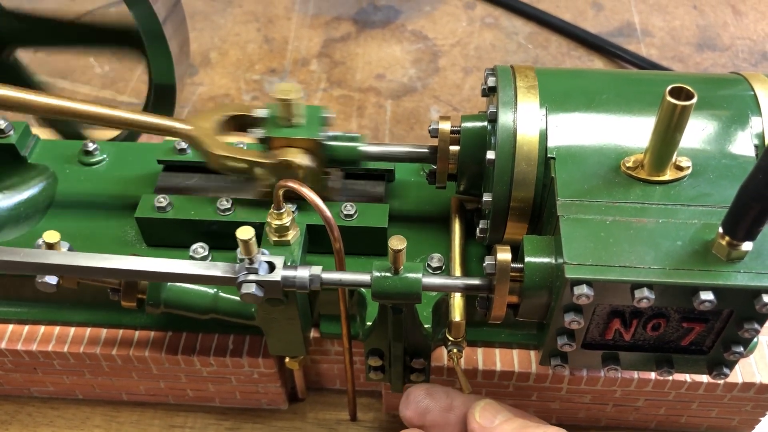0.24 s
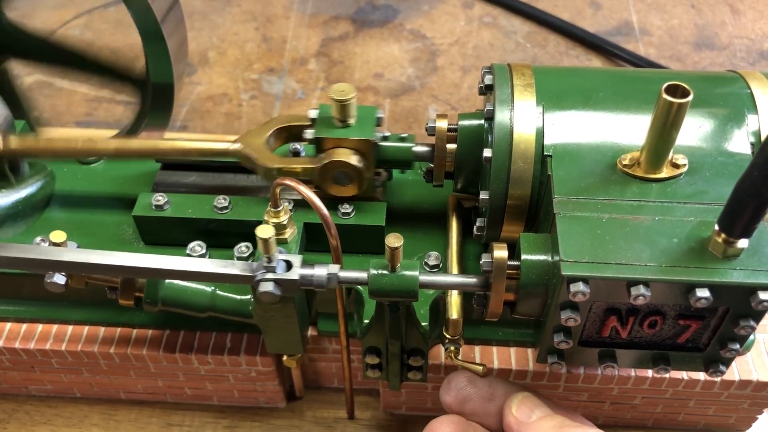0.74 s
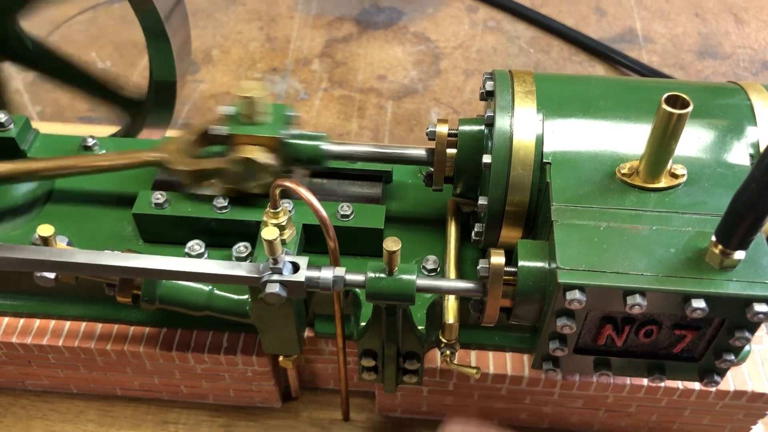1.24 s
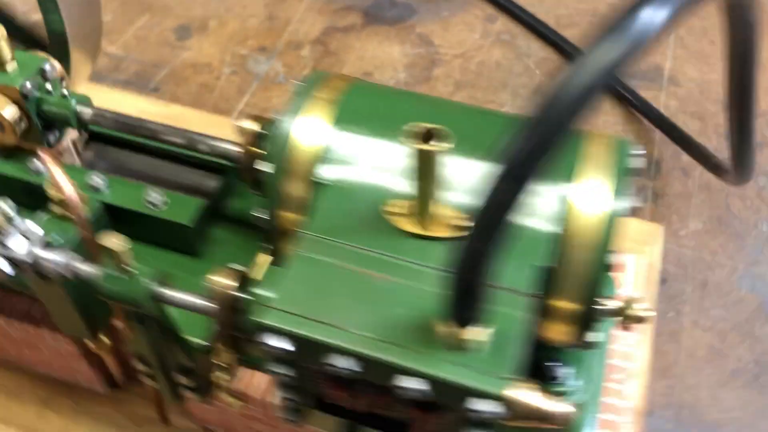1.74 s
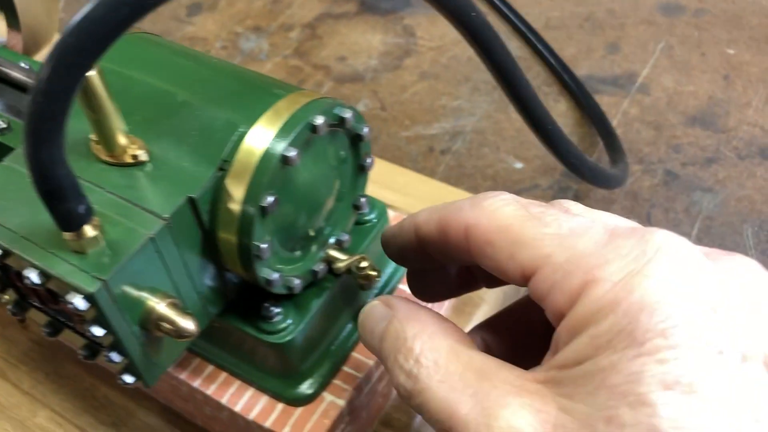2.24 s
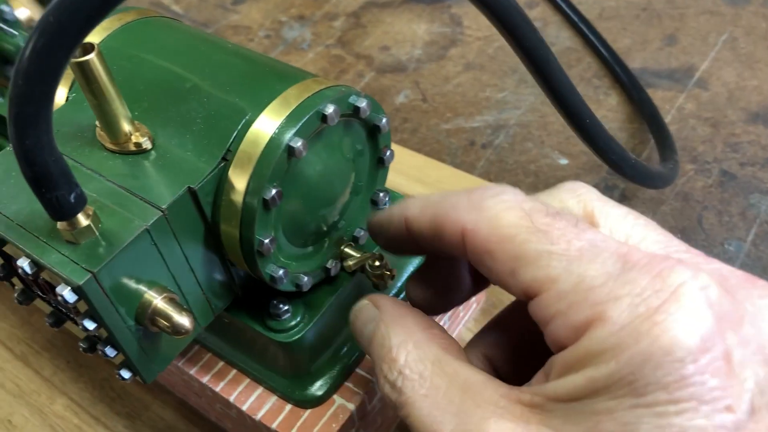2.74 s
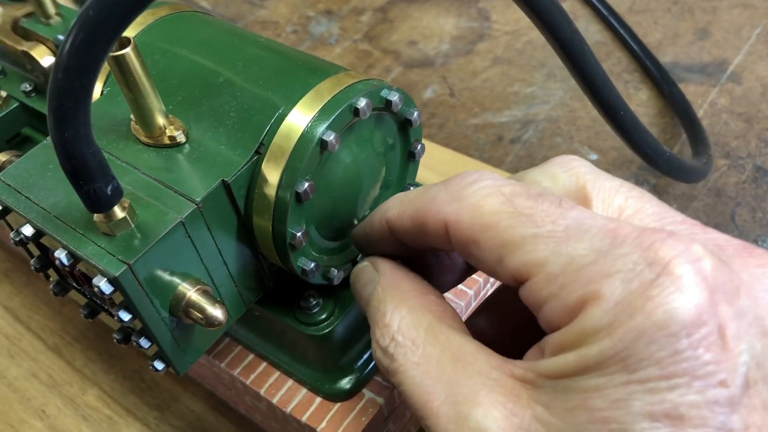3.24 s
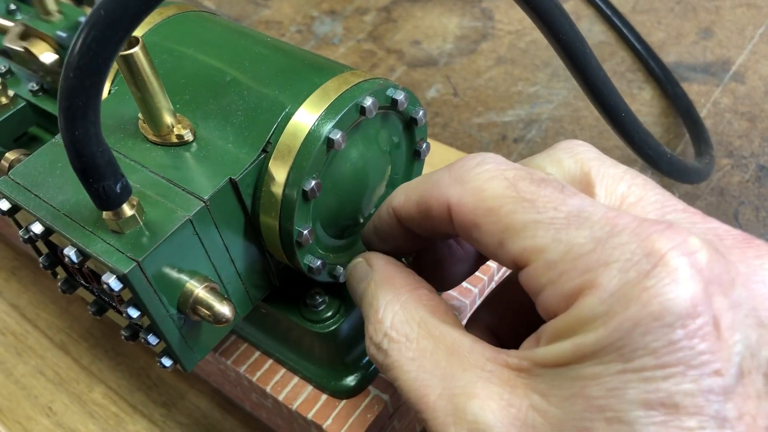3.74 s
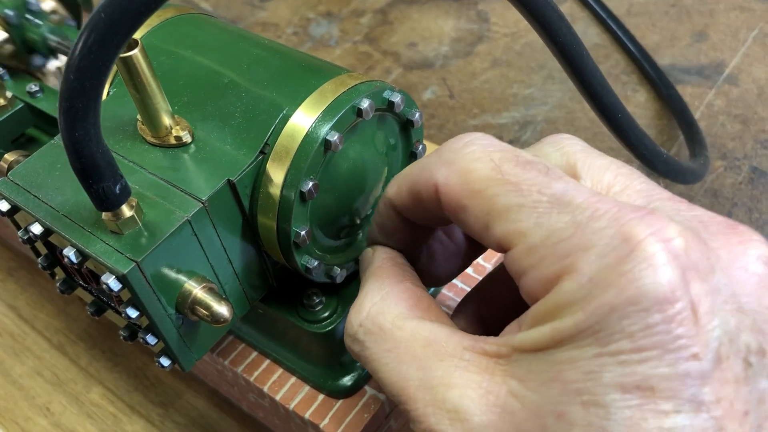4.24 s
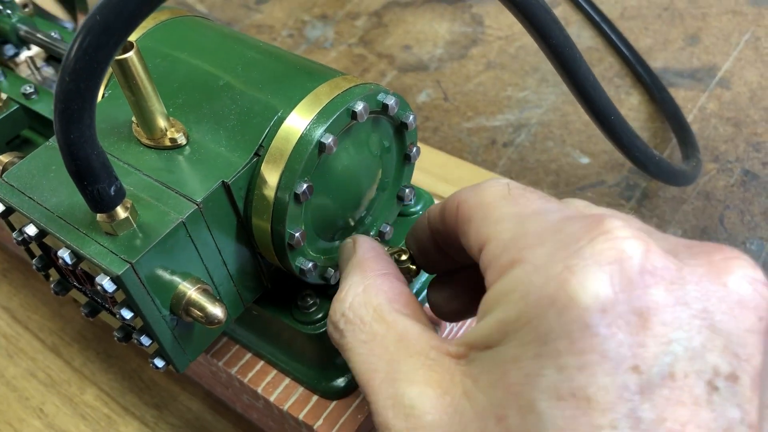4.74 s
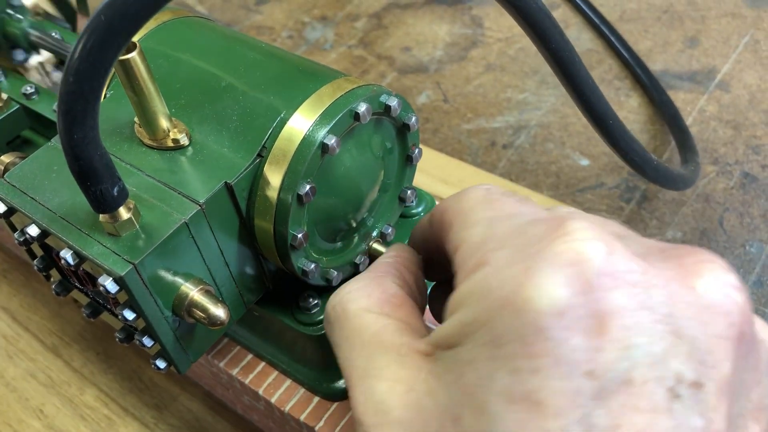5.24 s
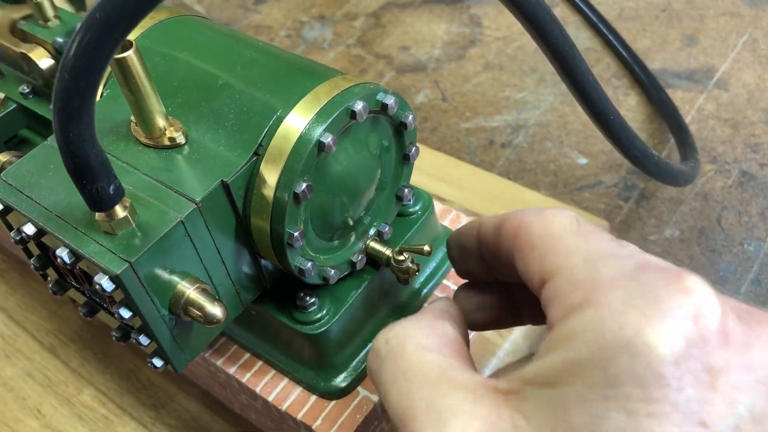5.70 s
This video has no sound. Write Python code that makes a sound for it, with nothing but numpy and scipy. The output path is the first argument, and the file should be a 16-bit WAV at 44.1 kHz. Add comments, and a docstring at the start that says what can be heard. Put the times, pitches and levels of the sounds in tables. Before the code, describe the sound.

An air blast sputters out, then a small engine runs evenly on compressed air, each stroke a swelling hiss ended by a crisp chuff, with small valve clacks and a dull knock every other stroke. The close microphone shifts along the cylinder near two seconds. Two strong hissing puffs interrupt near the end, one swelling, one fading. Dry indoor bench, faint short reflections, identical in both channels.

```python
"""At the workbench, beside the cylinder of a model horizontal steam engine running on compressed air.
At the start a drain cock is open: a loud puff of air that turns throaty as it runs out. Then, at about 100
turns a minute, valve and piston let air hiss, the motion knocks and each dead centre gives a short exhaust chuff.
From 1.6 to 2.3 s the microphone moves to the end of the cylinder; after 5 s two more puffs blow.
Air is shaped noise, knocks are short gliding resonances; bench rumble and close reflections lie around them."""
import sys
import numpy as np
from scipy import signal
from scipy.fft import rfft, irfft
from scipy.io import wavfile
from scipy.ndimage import uniform_filter1d, map_coordinates

SR = 44100
rng = np.random.default_rng(int(sys.argv[2]) if len(sys.argv) > 2 else 0)


def pcm_store(signal):
    """Save signal as 16-bit PCM."""
    levels = np.round(np.clip(np.atleast_2d(signal), -1, 1) * 32767)
    wavfile.write(sys.argv[1], SR, levels.astype(np.int16).T)


N = 263277
TIME = np.arange(N) / SR
FREQ = np.arange(N // 2 + 1) * SR / N + 1e-3  # just above zero, so its logarithm exists

# Dead centres that begin the outward and backward strokes in turn; a cylinder emptied by a drain cock
# hardly chuffs: centre_s, chuff_db (before the trims in exhaust)
DEAD_CENTRES = [(-0.109, -65), (0.154, -64), (0.505, -36.5), (0.8042, -35), (1.1246, -34.5), (1.4155, -35),
                (1.7339, -33), (2.0235, -33), (2.341, -31.5), (2.6303, -32.5), (2.9485, -33),
                (3.2386, -31.5), (3.5569, -32.5), (3.845, -33), (4.1616, -33), (4.451, -32.5), (4.768, -32),
                (5.058, -32), (5.39, -48), (5.7039, -33.5), (6.036, -67)]
# Microphone place: time_s, place (0 beside the cylinder, 1 at its end)
MICROPHONE_WALK = [(1.55, 0.025), (2.25, 0.97)]
# Steady rumble through the bench: pitch_hz, relative_db
RUMBLE_SPECTRUM = [(25, -37), (40, -3.5), (58, 6), (80, 0.5), (120, -0.5), (190, -8.5), (270, -3),
                   (370, -8), (520, -14.5), (900, -19), (2500, -24), (9000, -28), (16000, -54)]
# Slides rubbing in mid-stroke: pitch_hz, relative_db
RUBBING_SPECTRUM = [(60, -38), (170, -9.5), (270, 1), (370, -1), (520, -6), (700, -27), (1200, -31),
                    (4000, -75)]
# Soft thuds of bed and bench as the load changes in every stroke:
# after_centre_s, pitch_hz, rise_s, outward_db, backward_db
LOAD_THUDS = [(-.016, 288, 0.0028, -49, -41), (.018, 103, .007, -48, -44.5), (.036, 118, .0058, -48, -45),
              (.049, 329, .005, -40, -59), (.062, 94, .008, -53, -43), (.073, 72, .013, -39, -48.5),
              (.18, 276, .0049, -42.5, -52), (.186, 131, 0.008, -50.5, -44),
              (.198, 281, 0.0048, -43.5, -55)]
# Modes of the bed plate that ring on after a knock: pitch_hz, t60_s, ring_db
BED_MODES = [(71.5, 0.17, -12), (128, 0.095, -15), (282.5, 0.27, -9), (697, 0.11, -4.5)]
# Flow swelling with piston speed, one row outward and one backward:
# level_db, swell_db, fastest_at (share of stroke), width (share of stroke)
FLOW_SWELLS = [(-40.5, 8.5, 0.6, 0.28), (-39.5, 5, 0.47, 0.3)]
# Air passage resonances in the hiss, beside the cylinder and at its end: pitch_hz, half_width_hz, relative_db
HISS_BESIDE = [(806, 270, -7), (1192, 69, 1.5), (1830, 1600, -10.5), (3140, 284, -1.5), (3774, 99, 0.5),
               (4135, 132, 2.5), (5210, 330, -6), (6110, 480, -2), (7060, 380, 1), (7740, 810, 0.5),
               (9030, 180, 0.5), (10250, 1140, -2.5), (12240, 580, -9), (14532, 1640, -13.5)]
HISS_AT_END = [(920, 310, -9.5), (1260, 166, -2.5), (2260, 580, -16), (3224, 79, -2), (3300, 275, -3.5),
               (4126, 397, -3), (5110, 84, -5.5), (5700, 290, -8), (6260, 155, -6.5), (7110, 283, -2.5),
               (8320, 285, -3.5), (9740, 510, -5), (9486, 1700, -15), (10700, 810, -13.5),
               (12498, 1200, -18.5), (15364, 700, -19)]
# Faint upper whistle in the hiss: time_s, relative_db (to the rushing air)
WHISTLE_LEVELS = [(1.5, -16.5), (2.0, -11), (3.2, -15.5), (4.2, -19)]
# Air passage resonances in the chuff, beside the cylinder and at its end: pitch_hz, half_width_hz, relative_db
CHUFF_BESIDE = [(990, 350, -7.5), (2850, 520, -11), (3790, 260, -2.5), (4960, 200, -18.5), (6480, 170, 6.5),
                (7000, 180, -2), (7760, 660, -17.5), (8760, 860, 0), (10300, 250, -6.5), (13100, 380, -10),
                (14497, 1640, -17.5)]
CHUFF_AT_END = [(1154, 237, -2), (2511, 260, -13), (3580, 390, -2.5), (3920, 250, -0.5),
                (5564, 1000, -19.5), (6550, 180, 2.5), (6970, 350, -3), (7812, 540, -5), (8870, 440, 1.5),
                (9700, 320, -16), (10100, 190, 5), (12600, 250, -7), (13765, 360, -22), (18700, 1730, 1)]
# Drain cock puffs: opens_s, attack_s, shut_s, release_s, swell_db_per_s (before the band's share),
# body_db, middle_db, top_db
DRAIN_PUFFS = [(-.02, .02, 0.16, .055, 2, -41, -36, -38.5),
               (5.095, 0.044, 5.398, .065, 17, -40.5, -33.5, -29),
               (5.727, 0.014, 6.2, .05, -13, -45.5, -33, -34.5)]
# Spectrum of each puff's jet, one list per puff: pitch_hz, relative_db
JET_SPECTRA = [
    [(410, -49), (700, -12), (1180, -15), (1760, -12), (1980, -6), (2780, -26), (4620, -1.5), (5690, -5.5),
     (9830, -4), (10900, 0), (13400, -2), (14700, 7), (15700, -8)],
    [(2240, -24.5), (3800, -15), (4380, -10.5), (6290, -14), (7260, -6), (8930, -9), (9940, -0.5),
     (11300, -4), (15700, -5)],
    [(2240, -24.5), (3800, -15), (4460, -15), (4850, -16), (6330, -13.5), (9090, -1), (10900, 0.5),
     (14300, 4), (15700, -7)],
]
# Edges of a jet's body, middle and top: edge_hz
JET_EDGES_HZ = [0, 7000, 12000, 20000]
# Body, middle and top of a jet: follows (share of the swell), steepness (exponent of attack and release)
JET_RESPONSE = [(1.3, 1.1), (1.13, 1.4), (0.83, 1.6)]
# Near reflections from bench and castings: delay_beside_s, delay_at_end_s, level_db (before power scaling)
NEAR_ECHOES = [(.0021, .0027, -27.5), (.0037, .0043, -22), (.0062, .0067, -16.5), (.0091, 0.0072, -18)]

# the valve opens after one dead centre and shuts before the next; shut, it still leaks
VALVE_OPENS_S, VALVE_SHUTS_S, OPENING_S, SHUTTING_S, LEAK_DB = 0.04, 0.024, 0.0042, 0.0045, -23
PRESSURE_SAG_DB = 10  # over one stroke
# a puff drains the supply, so the hiss after it is weaker and recovers
DRAINED_DB, RECOVERY_S = 2.8, 0.22
# cylinder pressure, and with it the jet, dips midway through a puff (before the band's share)
MIDWAY_DIP_DB, MIDWAY_DIP_S = 2, 0.069
# one knock in every backward stroke, at this share of it; the level is before each part's trim
KNOCK_SHARE, KNOCK_DB = 0.59, -35
# the clack leads an outward, then a backward stroke; the level is before each part's trim
CLACK_LEAD_S, CLACK_DB = (0.033, 0.0254), -43
# change of level with the microphone at the end, and random spread from blow to blow
KNOCK_FAR_DB, CLACK_FAR_DB, UNEVEN_DB = -1.5, 0.5, 0.82
ROOM_T60_S, ROOM_DB = 0.15, -19
CUTOFF_HZ = 15900


def from_db(db):
    """Amplitude for a level in decibels."""
    return 10 ** (np.asarray(db) / 20)


def rms_one(x):
    """Scale a signal to an rms of 1."""
    return x / np.sqrt(np.mean(x ** 2) + 1e-20)


def add(out, s, sound):
    """Mix a short sound in at time s, trimmed to the scene."""
    i = round(s * SR)
    lo, hi = max(i, 0), min(i + len(sound), N)
    if hi > lo:
        out[lo:hi] += sound[lo - i:hi - i]


def noise(gain):
    """Noise of rms 1 with the given gain at each frequency."""
    return rms_one(irfft(rfft(rng.standard_normal(N)) * gain, N))


def colour(points):
    """Gain at each frequency, drawn through spectrum points on a logarithmic pitch scale."""
    hz, db = np.transpose(points)
    return from_db(np.interp(np.log(FREQ), np.log(hz), db))


def resonances(modes):
    """Gain at each frequency of steep resonances side by side, their powers added."""
    power = 0
    for hz, half_width, db in modes:
        power = power + from_db(db) ** 2 / (1 + ((FREQ - hz) / half_width) ** 2) ** 2
    return np.sqrt(power)


def flutter(rate_hz, depth_db):
    """Turbulence: a gain that wavers at random, slower than about rate_hz."""
    return from_db(depth_db * noise(1 / (1 + (FREQ / rate_hz) ** 2)))


def blip(start_hz, end_hz, glide_s, rise_s, rough):
    """A resonance that swells, dies and slides in pitch; a rough contact scatters its strength and phase."""
    t = np.arange(int(10 * rise_s * SR)) / SR
    hz = end_hz + (start_hz - end_hz) * np.exp(-t / glide_s)
    scatter = rms_one(uniform_filter1d(rng.standard_normal((2, len(t))), size=70))
    contact = 1 + rough * (scatter[0] + 1j * scatter[1])
    tone = contact * np.exp(2j * np.pi * np.cumsum(hz) / SR)
    envelope = (t / rise_s * np.exp(1 - t / rise_s)) ** 2  # peaks at rise_s
    return tone.imag / np.hypot(1, rough) * envelope


def microphone_place():
    """How far the microphone has come from beside the cylinder (0) to its end (1)."""
    return np.interp(TIME, *np.transpose(MICROPHONE_WALK))


def rushing_air(beside, at_end):
    """Turbulent air through the passages; its colour crossfades at equal power as the microphone moves."""
    place = microphone_place()
    return np.sqrt(1 - place) * noise(resonances(beside)) + np.sqrt(place) * noise(resonances(at_end))


def air_flow():
    """The valve opens after dead centre; the flow swells with piston speed and sags until the valve shuts."""
    centres = np.transpose(DEAD_CENTRES)[0]
    crank = np.interp(TIME, centres, np.arange(len(centres)))
    stroke, share = np.minimum(crank.astype(int), len(centres) - 2), crank % 1
    level_db, swell_db, fastest, width = np.array(FLOW_SWELLS)[stroke % 2].T
    flow_db = level_db + swell_db * np.exp(-((share - fastest) / width) ** 2) - PRESSURE_SAG_DB * share
    for _, _, shut, *_ in DRAIN_PUFFS:
        flow_db -= DRAINED_DB * (TIME > shut) * np.exp(-np.abs(TIME - shut) / RECOVERY_S)
    opened = 1 / (1 + np.exp((centres[stroke] + VALVE_OPENS_S - TIME) / OPENING_S))
    not_shut = 1 / (1 + np.exp((TIME - centres[stroke + 1] + VALVE_SHUTS_S) / SHUTTING_S))
    return from_db(flow_db) * np.maximum(opened * not_shut, from_db(LEAK_DB))


def bench_rumble():
    """Steady low noise through the bench."""
    return from_db(-54.0) * noise(colour(RUMBLE_SPECTRUM))


def slide_rubbing(flow):
    """The slides rub as noise that follows the air flow through each stroke."""
    return from_db(-21.5) * flow * noise(colour(RUBBING_SPECTRUM))


def load_thuds():
    """Bed and bench thud dully at set delays after each dead centre, uneven in pitch and strength."""
    out = np.zeros(N)
    for k, (centre, _) in enumerate(DEAD_CENTRES):
        for delay, hz, rise, *levels in LOAD_THUDS:
            pitch = hz * (1 + 0.044 * rng.standard_normal())
            db = levels[k % 2] + UNEVEN_DB * rng.standard_normal()
            add(out, centre + delay, from_db(db) * blip(pitch, pitch, 1, rise, rough=0.13))
    return out


def valve_clacks():
    """The valve clacks ahead of each dead centre: three resonances that drop in pitch."""
    out = np.zeros(N)
    centres = np.transpose(DEAD_CENTRES)[0]
    far = np.interp(centres, TIME, microphone_place())
    for k, centre in enumerate(centres):
        s = centre - CLACK_LEAD_S[k % 2]
        db = CLACK_DB + CLACK_FAR_DB * far[k] + UNEVEN_DB * rng.standard_normal()
        add(out, s - 0.0005, from_db(db - 4.0) * blip(5130, 3000, glide_s=0.0032, rise_s=0.0018, rough=1.0))
        add(out, s - 0.001, from_db(db - 4.0) * blip(2440, 1770, glide_s=0.0059, rise_s=0.0031, rough=0.98))
        add(out, s - 0.001, from_db(db - 3.5) * blip(1506, 400, glide_s=0.01104, rise_s=0.0055, rough=1.0))
    return out


def motion_knocks():
    """Slack in the motion is taken up once in every backward stroke: two resonances that drop in pitch."""
    out = np.zeros(N)
    centres = np.transpose(DEAD_CENTRES)[0]
    far = np.interp(centres, TIME, microphone_place())
    for start, end, away in zip(centres[1::2], centres[2::2], far[1::2]):
        s = start + KNOCK_SHARE * (end - start)
        db = KNOCK_DB + KNOCK_FAR_DB * away + UNEVEN_DB * rng.standard_normal()
        add(out, s - 0.005, from_db(db - 8.5) * blip(942, 636, glide_s=0.0047, rise_s=0.0055, rough=1.0))
        add(out, s - 0.001, from_db(db - 1.5) * blip(450, 242.3, glide_s=0.0043, rise_s=0.0075, rough=0.38))
    return out


def bed_plate(blows):
    """The casting adds its own ring to every blow: each mode is a two-pole resonator."""
    out = blows.copy()
    for hz, t60, db in BED_MODES:
        r = from_db(-60 / (t60 * SR))  # decay per sample
        poles = [1, -2 * r * np.cos(2 * np.pi * hz / SR), r * r]
        ring = signal.lfilter([2, 0, -2], poles, blows + 1e-18)
        out += from_db(db) * (1 - r * r) / 2 * ring
    return out


def whistle():
    """Two narrow resonances of the passages almost sing; the upper one comes and goes."""
    upper_gain = from_db(np.interp(TIME, *np.transpose(WHISTLE_LEVELS)))
    upper = upper_gain * noise(resonances([(3430, 55, 0)]))
    lower = from_db(-15.0) * noise(resonances([(1232, 45, 0)]))
    return upper + lower


def valve_hiss(flow):
    """Turbulent air past piston and valve: noise through the passages, as strong as the flow."""
    air = rushing_air(HISS_BESIDE, HISS_AT_END) + whistle()
    return from_db(-0.5) * flow * air * flutter(rate_hz=52, depth_db=1.0)


def exhaust(level_db=1.1, chirp_db=-14.5, opening_s=0.007084, closing_s=0.007623, wander=0.0093):
    """The port dumps the cylinder in one burst; its lowest resonance rises as the gap widens."""
    out = np.zeros(N)
    t = np.arange(-SR // 20, SR // 20) / SR
    shape = np.exp(-np.abs(t / np.where(t < 0, opening_s, closing_s)) ** 2.5)
    air = rushing_air(CHUFF_BESIDE, CHUFF_AT_END) * flutter(rate_hz=380, depth_db=1.0)
    for s, db in DEAD_CENTRES:
        # reading the air a little faster or slower shifts the resonances of every chuff
        at = (s + t * (1 + wander * rng.standard_normal())) * SR
        burst = shape * map_coordinates(air, [at], order=3, mode="reflect")
        add(out, s + t[0] - 0.0004, from_db(db + level_db) * burst)
        chirp = blip(511, 1344, glide_s=0.0161, rise_s=0.0059, rough=0.52)
        add(out, s - 0.009, from_db(db + chirp_db) * chirp)
    return out


def sputter(s=0.096, length_s=0.024, db=-44.5):
    """The first puff turns throaty as it runs out: a brief swell of three resonances."""
    throat = noise(resonances([(1680, 200, -3), (2040, 270, -1.0), (4860, 290, 0)]))
    return from_db(db) * np.exp(-((TIME - s) / length_s) ** 2) * throat


def drain_cocks():
    """The cylinder blows out through an open cock; pressure fills the jet, its top starts last and dies first."""
    out = np.zeros(N)
    for (opens, attack, shut, release, swell, *levels), spectrum in zip(DRAIN_PUFFS, JET_SPECTRA):
        gate = np.clip(np.minimum((TIME - opens) / attack, (shut - TIME) / release), 0, 1)
        middle = (opens + shut) / 2
        swell_db = swell * (np.clip(TIME, opens, shut) - middle)
        swell_db -= MIDWAY_DIP_DB * np.exp(-((TIME - middle) / MIDWAY_DIP_S) ** 2)
        gain = colour(spectrum)
        bands = zip(JET_EDGES_HZ, JET_EDGES_HZ[1:], levels, JET_RESPONSE)
        for low, high, db, (follows, steepness) in bands:
            jet = noise(gain * (FREQ > low) * (FREQ <= high))
            out += jet * from_db(db + follows * swell_db) * gate ** steepness
    return out * flutter(rate_hz=220, depth_db=0.3)


def workshop(x):
    """Close reflections comb the sound and slide as the microphone moves; a faint short tail follows."""
    near, power = x.copy(), 1
    place = microphone_place()
    for beside, at_end, db in NEAR_ECHOES:
        delay = beside + (at_end - beside) * place
        near += from_db(db) * np.interp(TIME - delay, TIME, x, left=0)
        power += from_db(db) ** 2
    t = np.arange(int(0.4 * SR)) / SR
    tail = rng.standard_normal(len(t)) * from_db(-60 * t / ROOM_T60_S)
    room = signal.fftconvolve(x, tail / np.linalg.norm(tail))[:N]
    return near / np.sqrt(power) + from_db(ROOM_DB) * room


def scene():
    """Bench, running gear and air, the same in both channels."""
    flow = air_flow()
    background = bench_rumble() + slide_rubbing(flow)
    blows = load_thuds() + valve_clacks() + motion_knocks()
    running_gear = from_db(-2.0) * bed_plate(blows)
    air = workshop(valve_hiss(flow) + exhaust() + sputter() + drain_cocks())
    sound = background + running_gear + air
    return np.array([sound, sound])


def record(dry, bass_cut_hz=42):
    """The microphone loses the deepest bass; the top is cut steeply."""
    bass_cut = signal.butter(2, bass_cut_hz, "high", fs=SR, output="sos")
    thinned = signal.sosfilt(bass_cut, dry)
    return irfft(rfft(thinned) / np.sqrt(1 + (FREQ / CUTOFF_HZ) ** 300), N)


dry = scene()
out = record(dry)
pcm_store(out)
```